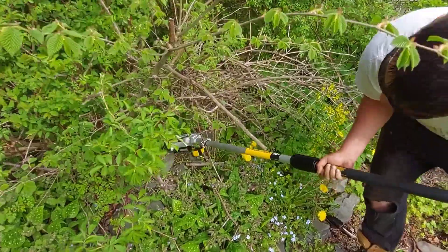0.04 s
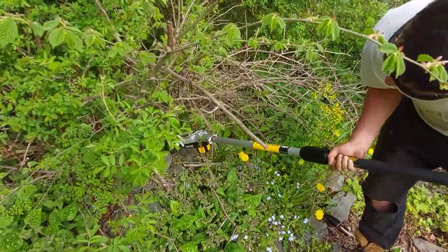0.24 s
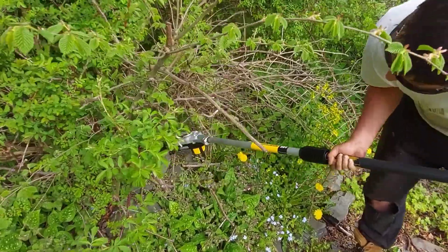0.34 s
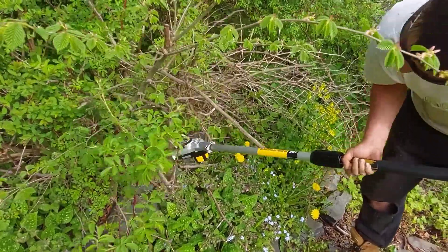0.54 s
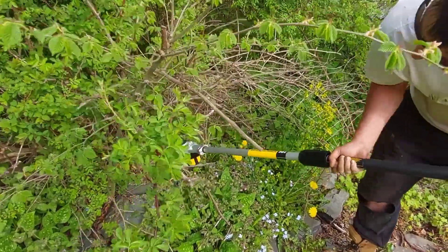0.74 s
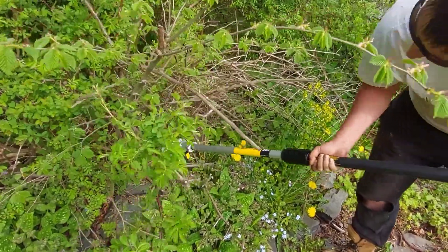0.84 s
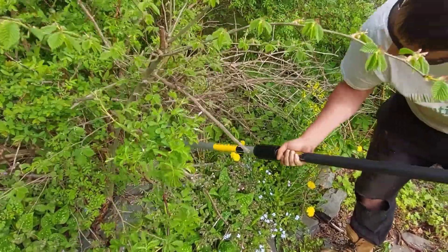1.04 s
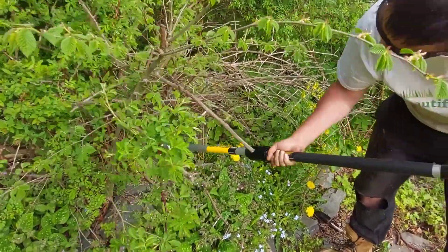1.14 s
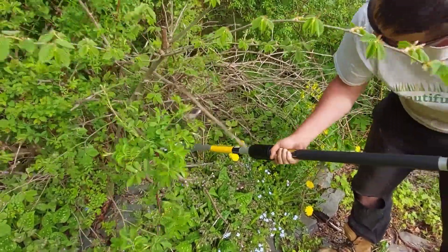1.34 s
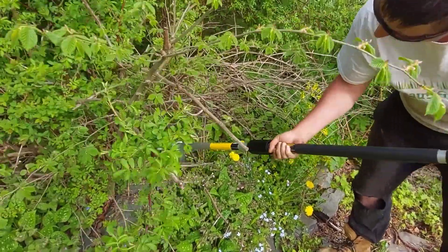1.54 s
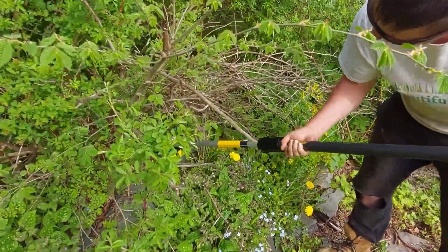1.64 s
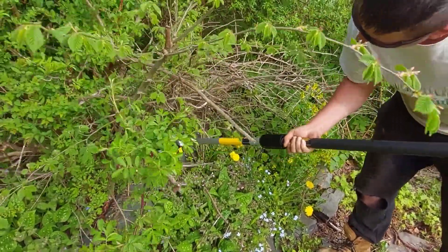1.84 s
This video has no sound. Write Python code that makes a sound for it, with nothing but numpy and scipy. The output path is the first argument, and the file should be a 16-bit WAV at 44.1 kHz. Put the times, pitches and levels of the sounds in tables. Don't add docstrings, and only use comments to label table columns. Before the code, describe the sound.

Wind rumble and faint leaf rustle open. At 0.12 s a small electric pole chainsaw spins up, its gear whine and chain rattle rising; a sharp snap comes at 0.31, twig crackles and rasps at 0.4-0.66. It runs free and shrill until 1.0, then bites wood, pitch sagging unevenly, with a brief squeal. It winds down from 1.35 to 1.5; leaves rustle, a far bird whistles at 1.6, a faint bee hums from 1.72.

```python
import sys
import numpy as np
from scipy import signal
from scipy.fft import rfft, irfft, next_fast_len
from scipy.io import wavfile
from scipy.ndimage import uniform_filter1d

SR = 44100
rng = np.random.default_rng(int(sys.argv[2]) if len(sys.argv) > 2 else 0)


def voltage_ratio(level):
    return 10 ** (np.asarray(level, float) / 20)


def materialize(psi):
    bounded = np.clip(np.atleast_2d(psi).T, -1, 1)
    quanta = np.round(bounded * 32767).astype(np.int16)
    wavfile.write(sys.argv[1], SR, quanta)


N = 83790
TIME = np.arange(N) / SR
PADDED = next_fast_len(N + SR // 4)
HZ = np.maximum(np.fft.rfftfreq(PADDED, 1 / SR), 1)


def rms_one(x):
    return x / np.sqrt(np.mean(x ** 2) + 1e-20)


def in_time(rows):
    s, *columns = np.transpose(rows)
    return [np.interp(TIME, s, c) for c in columns]


def at_hz(points, peaks=()):
    hz, value = np.transpose(points)
    curve = np.interp(np.log(HZ), np.log(hz), value)
    return curve + sum(db / (1 + (2 * (HZ - f) / w) ** 2) for f, w, db in peaks)


def colour(x, points, peaks=()):
    gain = rms_one(voltage_ratio(at_hz(points, peaks)))
    return irfft(rfft(x, PADDED) * gain, PADDED)[..., :N]


def drift(rate_hz):
    r = np.exp(-2 * np.pi * rate_hz / SR)
    noise = rng.standard_normal(N + SR)
    return rms_one(signal.lfilter([1], [1, -2 * r, r * r], noise)[SR:])


GRAINS_PER_S, GRAIN_DB = 2700, 0


def grit(share):
    size_db = GRAIN_DB * np.minimum(rng.exponential(1, N), 5)
    ticks = (rng.random(N) < GRAINS_PER_S / SR) * voltage_ratio(size_db)
    shape = rms_one(signal.lfilter([1], [1, -.9], ticks))
    return rms_one(rng.standard_normal((2, N)) * (1 - share + share * shape))


# time in seconds, level in dB.
WIND = [(0.0, -34), (0.088, -46.5), (0.11, -39), (0.264, -42.5), (0.316, -35), (0.344, -45.5), (0.518, -47),
        (0.93, -59.5), (0.946, -75), (1.084, -44.5), (1.158, -67), (1.238, -55), (1.264, -66),
        (1.376, -45.5), (1.428, -63), (1.756, -62.5), (1.862, -46.5), (1.9, -82)]
WIND_COLOUR, WIND_LUMP_DB, WIND_LEFT_DB = [(25, -15), (65, 9.5), (140, 3), (250, -15.5), (500, -23), (900, -42)], 0, 4
WIND_DB, WIND_SHARED = 1, 0.46


def wind():
    lumps = voltage_ratio(WIND_LUMP_DB * np.array([drift(40), drift(18)]))
    gusts = rng.standard_normal((2, N)) + WIND_SHARED * rng.standard_normal(N)
    level = voltage_ratio(WIND_DB + in_time(WIND)[0])
    rumble = colour(rms_one(gusts * lumps) * level, WIND_COLOUR)
    return rumble * voltage_ratio(WIND_LEFT_DB * np.array([[1], [-1]]))


# frequency in Hz, level in dB.
AIR = [(100, -2), (430, -6), (620, -17), (1000, -30), (2800, -41), (4200, -33), (8500, -37), (14000, -28)]
AIR_DB = -58.5


def still_air():
    return voltage_ratio(AIR_DB) * colour(grit(0.017), AIR)


# time in seconds, pitch in Hz, level in dB.
BIRD = [
    (1.5, 4150, -90),
    (1.515, 4100, -71),
    (1.57, 3900, -73),
    (1.588, 4050, -78),
    (1.6, 4450, -64),
    (1.63, 5200, -63),
    (1.68, 5800, -70),
    (1.7, 5900, -90),
]


def bird():
    hz, db = in_time(BIRD)
    whistle = voltage_ratio(db + 5.4 * drift(34)) * np.sin(2 * np.pi * np.cumsum(hz) / SR)
    return whistle * voltage_ratio(np.array([[3.0], [-4.0]]))


BEE_S, BEE_HZ, BEE_DB = 1.72, 219, -52


def bee():
    fade_in = np.clip((TIME - BEE_S) * 20, 0, 1)
    return voltage_ratio(BEE_DB) * fade_in * np.sin(2 * np.pi * BEE_HZ * TIME + 0.4 * drift(4.2))


# time in seconds, level in dB.
LEAVES = [(0, -56), (.04, -59), (.09, -68), (1.4, -58), (1.44, -51), (1.49, -61), (1.55, -61), (1.6, -76),
          (1.625, -76), (1.635, -57), (1.71, -53), (1.76, -53), (1.8, -60), (1.822, -59), (1.835, -76)]
# frequency in Hz, level in dB.
LEAF = [(600, -8), (1200, -11), (2200, -3), (3200, -5), (5200, 0), (9000, -6), (14000, 0)]
LEAF_GRIT, LEAF_FLICKER_DB = .4, 2.0


def leaves():
    level = voltage_ratio(in_time(LEAVES)[0] + LEAF_FLICKER_DB * drift(90))
    return colour(grit(LEAF_GRIT) * level, LEAF)


# start in seconds, peak in dB.
SNAPS = [(.12, -45), (.153, -38), (.2313, -34), (.3122, -11), (.4368, -25), (.4832, -20), (.5, -20),
         (.516, -20), (.5735, -20), (.587, -19), (.6, -21), (.6423, -22), (.66, -22), (1.0095, -20),
         (1.07, -21), (1.085, -20), (1.178, -21), (1.358, -27), (1.412, -38), (1.421, -36), (1.43, -38),
         (1.438, -40), (1.509, -47), (1.537, -52), (1.633, -49), (1.709, -43), (1.744, -42), (1.75, -44),
         (1.783, -49), (1.809, -34)]
# frequency in Hz, level in dB.
TWIG = [(1500, -30), (3000, -16), (4600, 0), (6200, -4), (8000, 0), (10000, -6), (14000, -4)]
SNAP_RISE_S, SNAP_FALL_S = .0003, .0025


def snap_bursts():
    s, db = np.transpose(SNAPS)[:, :, None]
    age = np.maximum(TIME - s, 0)
    bursts = voltage_ratio(db) * (1 - np.exp(-age / SNAP_RISE_S)) * np.exp(-age / SNAP_FALL_S)
    return colour(grit(0.31) * bursts.sum(0), TWIG)


# centre in seconds, length in seconds, from Hz, to Hz, level in dB.
SQUEALS = [
    (0.427, 0.07, 2314, 2520, -36),
    (1.08, 0.029, 2520, 2367, -26.5),
    (1.371, 0.037, 1250, 1150, -31),
]


def squeals():
    s, length, from_hz, to_hz, db = np.transpose(SQUEALS)[:, :, None]
    along = (TIME - s) / length
    hz = from_hz + (to_hz - from_hz) * np.clip(along + .5, 0, 1)
    level = voltage_ratio(db + 2.5 * drift(49)) * np.exp(-(2 * along) ** 4)
    phase = 2 * np.pi * np.cumsum(hz, axis=1) / SR + 1.55 * drift(60)
    return (level * np.sin(phase)).sum(0)


# peak time in
# seconds, level in dB, length in seconds, chip spray in dB re bite.
BITES = [(.012, -53, 0.015, -3), (0.167, -40.5, 0.087, -29), (0.264, -32.5, 0.058, -4),
         (0.434, -39.5, 0.091, 8.5), (0.491, -32, 0.018, 0), (0.51, -28, 0.032, -1), (0.546, -36, 0.037, 6),
         (0.589, -31.5, 0.042, 7), (0.656, -31.5, 0.049, 0), (0.828, -41.5, 0.015, 11),
         (0.877, -48, .02, 10), (0.928, -41, 0.016, 11), (1.015, -26, 0.023, 2.5), (1.08, -20, 0.03, -7.5),
         (1.119, -25.5, 0.026, -8), (1.179, -26, 0.083, -4), (1.235, -41, 0.12, -9),
         (1.284, -31.5, 0.029, 1), (1.317, -24, 0.022, -11.5), (1.341, -26.5, 0.017, -24),
         (1.369, -30.5, 0.065, -37)]
# frequency in Hz, level in dB.
WOOD = [(60, -20), (150, -9), (390, -4), (620, -16.5), (1200, -5.5), (2500, -10), (3200, 1.5),
        (7000, -15.5)]
# frequency in Hz, width in Hz, gain in dB.
STEM = [(137, 41, 4.5), (805, 230, 6.4), (1250, 260, 4.8), (1390, 210, 2.8), (1750, 160, 6),
        (2136, 300, 9.4), (2420, 160, 11.3)]
# frequency in Hz, level in dB.
CHIPS = [(1500, -30), (4000, -5), (8000, -4), (12500, 0), (15500, -4)]
GRAIN_SHARE = 0.64
BITE_RISE_SHARE = 0.75


def cutting():
    s, db, length, spray_db = np.transpose(BITES)[:, :, None]
    width = length * np.where(TIME < s, BITE_RISE_SHARE, 1.3)
    swell = voltage_ratio(db) * np.exp(-(2 * (TIME - s) / width) ** 2)
    rough = voltage_ratio(0.83 * drift(140))
    rasp = colour(grit(GRAIN_SHARE) * rough * swell.sum(0), WOOD, STEM)
    spray = colour(grit(GRAIN_SHARE) * rough * (swell * voltage_ratio(spray_db)).sum(0), CHIPS)
    return rasp + spray


# time in seconds, gear mesh in Hz, chain clatter in dB, whine in dB.
MOTOR = [(0.116, 695.7, -55, -74), (.127, 979, -48.5, -75), (.225, 1907, -33.5, -66),
         (.375, 3340, -27.5, -39.5), (.425, 3799, -34.5, -32), (.44, 3872, -26, -57), (.62, 4650, -27, -34),
         (.74, 5120, -27.5, -31), (1.015, 5185, -27, -28), (1.085, 3596, -21.5, -53),
         (1.155, 4413, -27, -34), (1.184, 3346, -21, -57), (1.228, 3520, -23, -42), (1.262, 3660, -26, -35),
         (1.3, 3900, -23.5, -40), (1.345, 3853, -30.5, -39), (1.41, 2250, -38, -73), (1.5, 503, -55.5, -90)]
# frequency in Hz, level in dB.
CHAIN = [(150, -69.5), (400, -13), (620, -28.5), (1100, -11), (3100, -6), (5000, -4), (8500, -12.5),
         (15000, -9.5)]
# frequency in Hz, width in Hz, gain in dB.
BAR = [(800, 340, 10.5), (1150, 29, 8.4), (1590, 390, 2.3), (2215, 70, 5), (2520, 460, 4.4),
       (3665, 86, 5.7), (4030, 73, 1.5), (7600, 150, 0.5), (9680, 990, 6.7), (12500, 790, 0.71)]
MESH_PER_TURN, SPROCKET_TEETH, TOP_MESH_HZ, REST_DB_PER_S = 104, 6, 4836, 300
TURN_DEPTH, LINK_DEPTH, TOOTH_DEPTH = .15, .07, .15
SIZZLE_HZ, SIZZLE_DB_PER_OCTAVE = 7000, 9.5
HOUSING_HZ, HOUSING_WIDTH_HZ, HOUSING_DB, WHINE_ROUGH, WHINE_FLICKER_DB = 3590, 460, 17, .6, 1.5
TOOTH_DB, LINK_RING_DB, LINK_RING_ORDER = -19.5, -14, 4
OVERTONE_DB, OVERTONE_HZ, OVERTONE_WIDTH_HZ = -13, 420, 280


def chain_clatter(level, beat, speed):
    clatter = colour(grit(0.19) * beat * level * voltage_ratio(0.82 * drift(33.0)), CHAIN, BAR)
    sizzle = irfft(rfft(clatter, PADDED) / (1 + (SIZZLE_HZ / HZ) ** 4), PADDED)[:, :N]
    return clatter + sizzle * (voltage_ratio(SIZZLE_DB_PER_OCTAVE * np.log2(speed)) - 1)


def gear_whine(mesh_hz, whine_db, turn, beat, speed):
    swell_db = HOUSING_DB / (1 + (2 * (mesh_hz - HOUSING_HZ) / HOUSING_WIDTH_HZ) ** 4)
    right_db = np.interp(mesh_hz, HZ, at_hz(SHADE, DIPS)) - 7.0
    phase = MESH_PER_TURN * turn + WHINE_ROUGH * speed * drift(88)
    left = np.sin(phase)
    right = voltage_ratio(right_db) * np.sin(phase - 2 * np.pi * mesh_hz * LAG_S)
    level = voltage_ratio(whine_db + swell_db + WHINE_FLICKER_DB * drift(31)) * beat ** 0.5
    return level * np.array([left, right])


def sprocket_hum(mesh_hz, turn, speed):
    tooth = SPROCKET_TEETH * turn + 0.56 * drift(39.6)
    hum = voltage_ratio(TOOTH_DB + 0.63 * drift(7.9)) * speed ** 2 * np.sin(tooth)
    overtone_hz = 2 * SPROCKET_TEETH * mesh_hz / MESH_PER_TURN
    resonance = 1 / (1 + (2 * (overtone_hz - OVERTONE_HZ) / OVERTONE_WIDTH_HZ) ** 8)
    overtone = voltage_ratio(OVERTONE_DB + 1.4 * drift(7.5)) * resonance * np.sin(2 * tooth)
    ring = voltage_ratio(LINK_RING_DB + 2.55 * drift(25)) * speed ** 6 * np.sin(LINK_RING_ORDER * tooth)
    return hum + overtone + ring


def saw_motor():
    mesh_hz, chain_db, whine_db = in_time(MOTOR)
    rest_s = np.abs(TIME - np.clip(TIME, MOTOR[0][0], MOTOR[-1][0]))
    chain_level = voltage_ratio(chain_db - REST_DB_PER_S * rest_s)
    speed = mesh_hz / TOP_MESH_HZ
    turn = 2 * np.pi * np.cumsum(mesh_hz) / SR / MESH_PER_TURN
    beat = 1 + TURN_DEPTH * (np.cos(turn) + .5 * np.cos(2 * turn + 1))
    beat = beat + LINK_DEPTH * np.cos(turn / 2) + TOOTH_DEPTH * np.cos(SPROCKET_TEETH * turn)
    clatter = chain_clatter(chain_level, beat, speed)
    whine = gear_whine(mesh_hz, whine_db, turn, beat, speed)
    return clatter, whine + chain_level * sprocket_hum(mesh_hz, turn, speed)


STREAK_DB, STREAK_HZ, STREAK_S = 2.2, 130, .04


def streaks(pair):
    hz, s, cells = signal.stft(pair, SR, nperseg=1024, noverlap=768)
    field = rng.standard_normal(cells.shape[1:])
    for axis, size in enumerate((STREAK_HZ / hz[1], STREAK_S / s[1])):
        field = uniform_filter1d(field, size=int(size), axis=axis)
        field = uniform_filter1d(field, size=2, axis=axis)
    gain = rms_one(voltage_ratio(STREAK_DB * rms_one(field)))
    return signal.istft(cells * gain, SR, nperseg=1024, noverlap=768)[1][:, :N]


# frequency in Hz, level in dB.
SHADE = [(100, 0), (1900, 1), (2500, -6), (4200, -3), (7400, -2), (11500, 0), (13000, -4), (14200, -11)]
# frequency in Hz, width in Hz, gain in dB.
DIPS = [(3360, 360, 2), (5660, 1460, -13.5), (9550, 410, -35)]
# frequency in Hz, likeness 0-1.
ALIKE = [(300, .87), (1300, .85), (2500, .3), (3300, .96), (4000, .55), (6500, .45), (11200, .35),
         (13400, .6)]
# frequency in Hz, width in Hz, gain in dB.
CASE_DIP = [(2885, 113, -2), (574, 44, -9.5)]
LAG_S, LAG_ENDS_HZ = .000153, 9100


def ports(pair):
    left, other = rfft(pair, PADDED)
    alike = np.clip(at_hz(ALIKE), 0, 1)
    lag = np.exp(-2j * np.pi * HZ * LAG_S * (HZ < LAG_ENDS_HZ))
    right = alike * lag * left + np.sqrt(1 - alike ** 2) * other
    right = right * voltage_ratio(at_hz(SHADE, DIPS))
    case = voltage_ratio(at_hz([(100, 0), (200, 0.0057)], CASE_DIP))
    return irfft(np.array([left, right]) * case, PADDED)[:, :N]


def scene():
    background = wind() + bee() + bird()
    thicket = snap_bursts() + leaves() + still_air()
    clatter, tones = saw_motor()
    noises = streaks(clatter) + cutting() + squeals() + thicket
    return voltage_ratio(5.5) * ports(noises) + tones + background


def roll_off(x):
    return signal.sosfilt(signal.butter(12, 17010, fs=SR, output="sos"), x)


def record(dry):
    top_cut = signal.ellip(14, .5, 62, 15780, fs=SR, output="sos")
    mix = signal.sosfilt(top_cut, dry)
    return roll_off(mix)


dry = scene()
out = record(dry)
materialize(out)
```